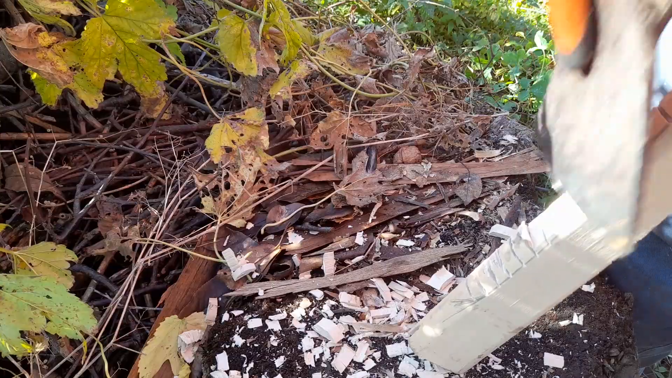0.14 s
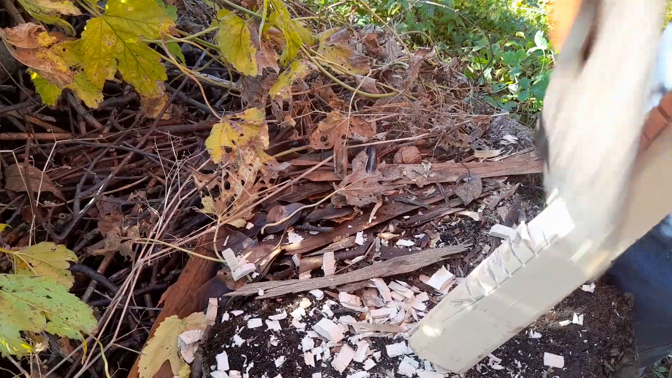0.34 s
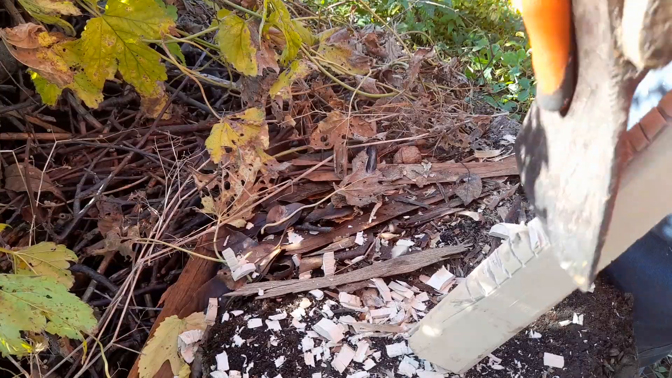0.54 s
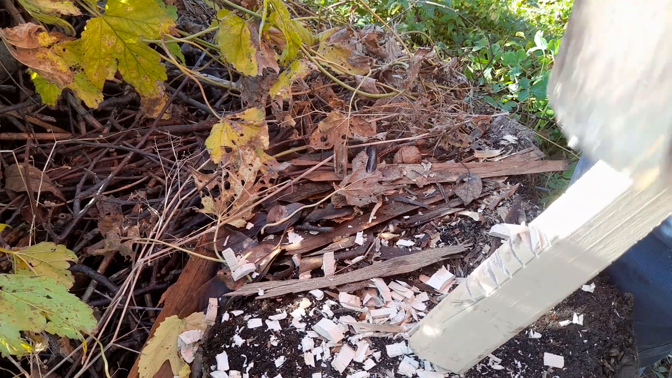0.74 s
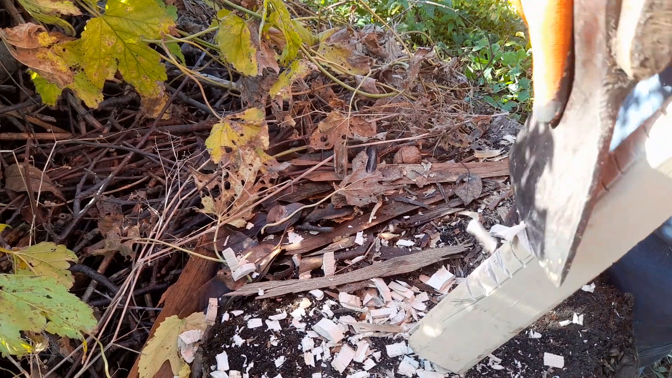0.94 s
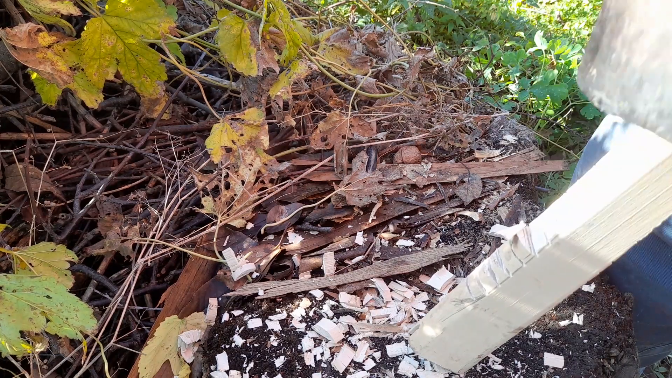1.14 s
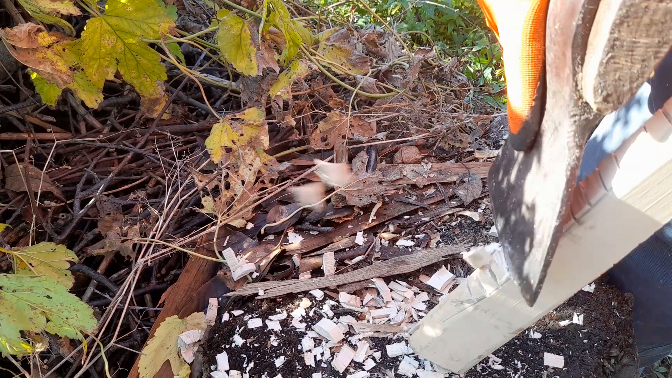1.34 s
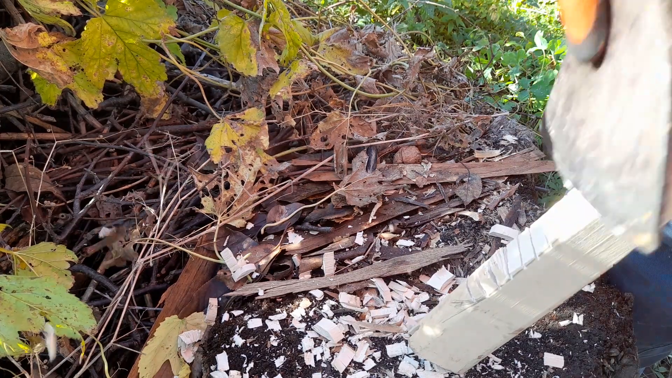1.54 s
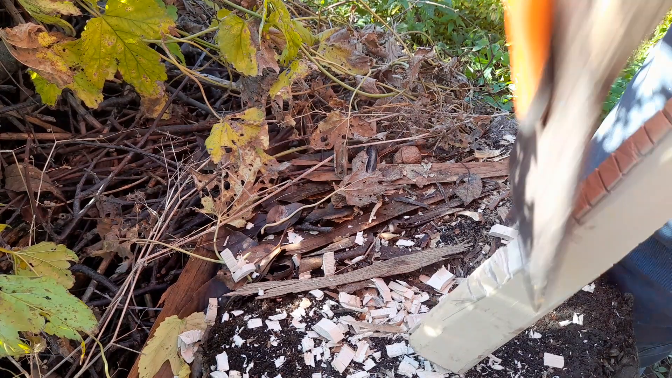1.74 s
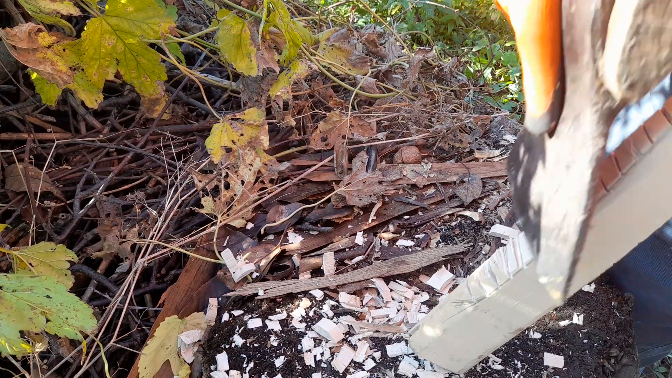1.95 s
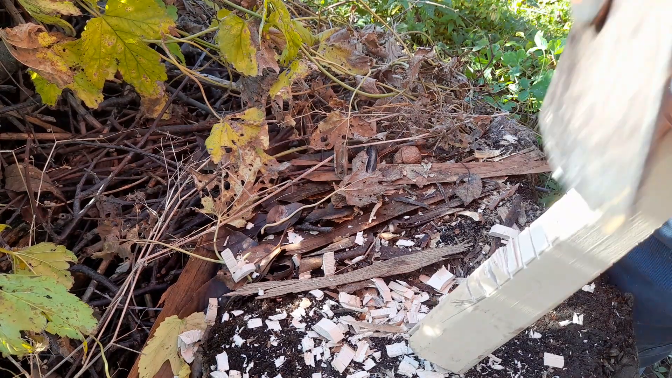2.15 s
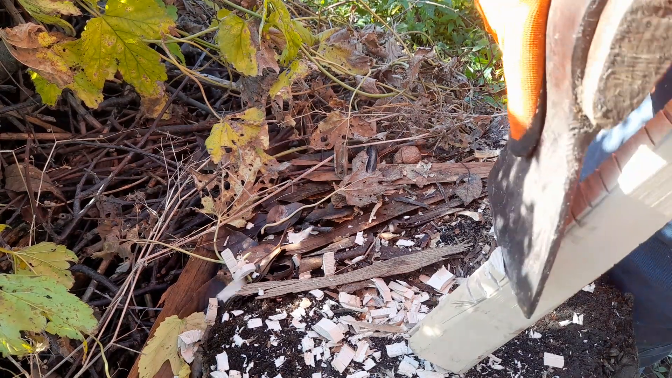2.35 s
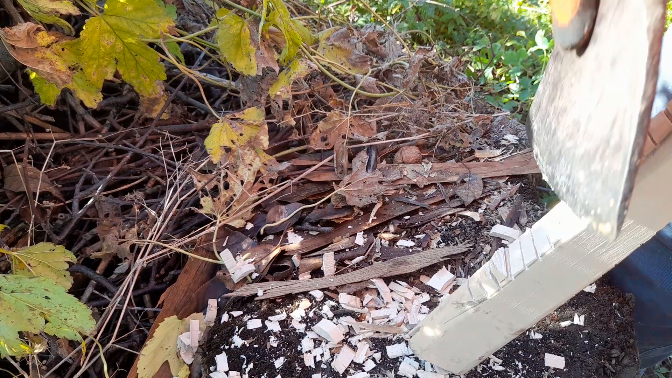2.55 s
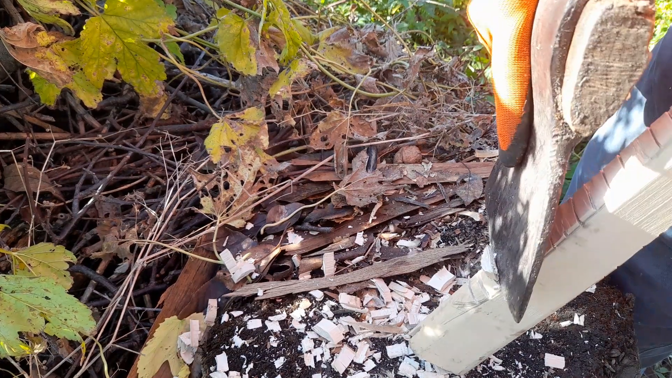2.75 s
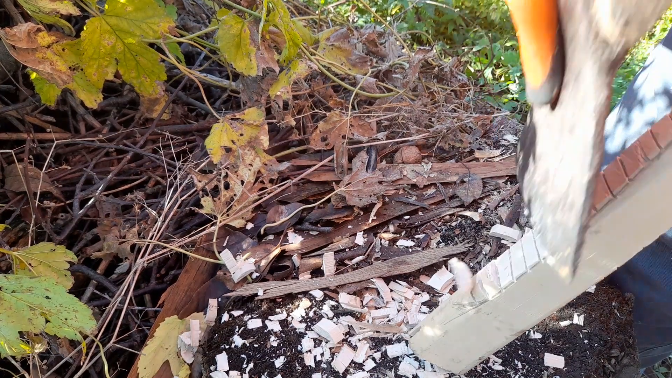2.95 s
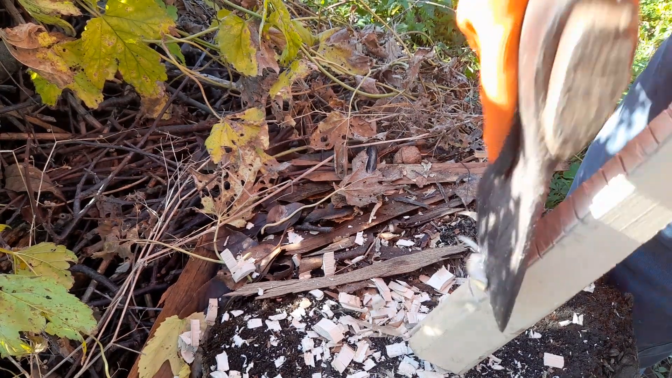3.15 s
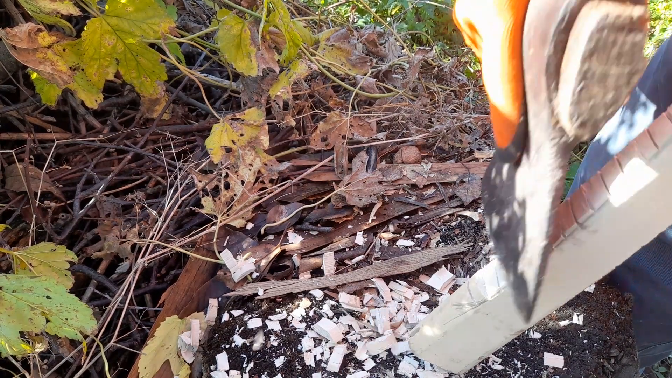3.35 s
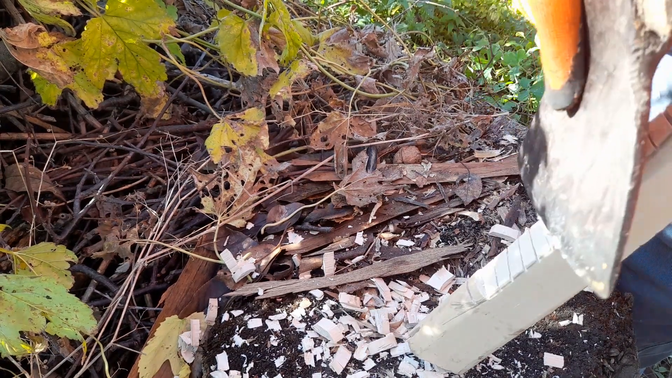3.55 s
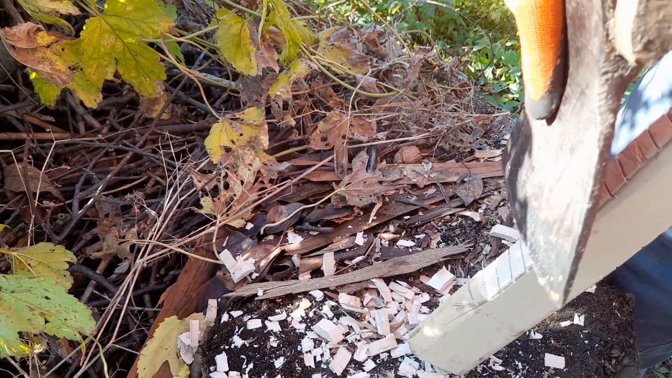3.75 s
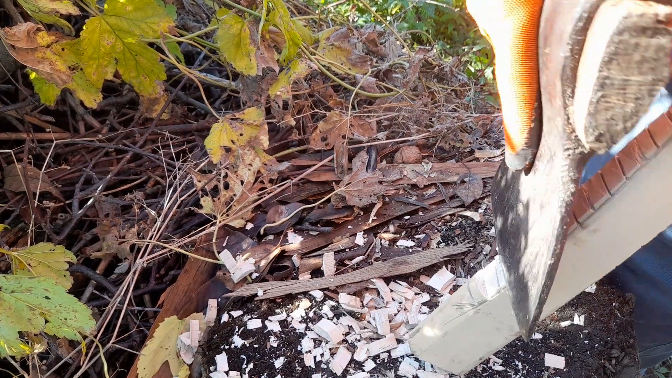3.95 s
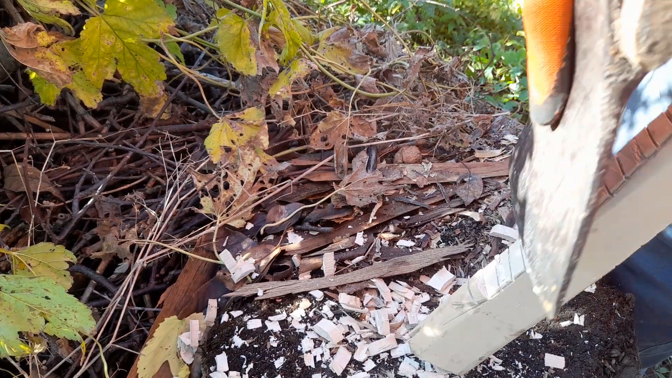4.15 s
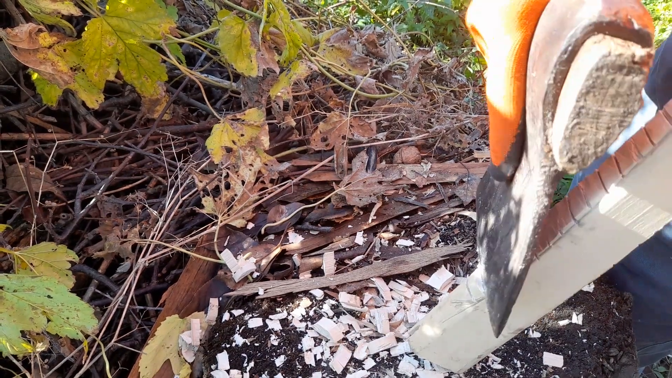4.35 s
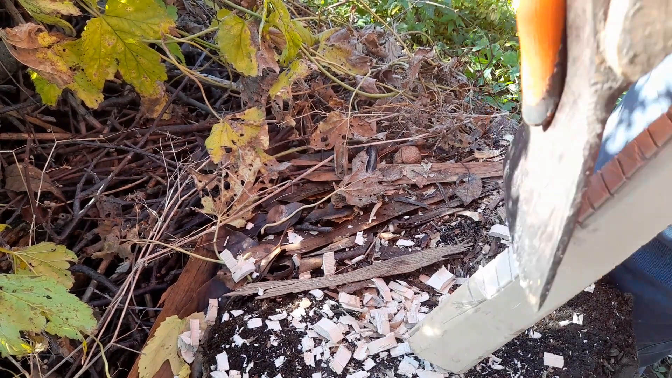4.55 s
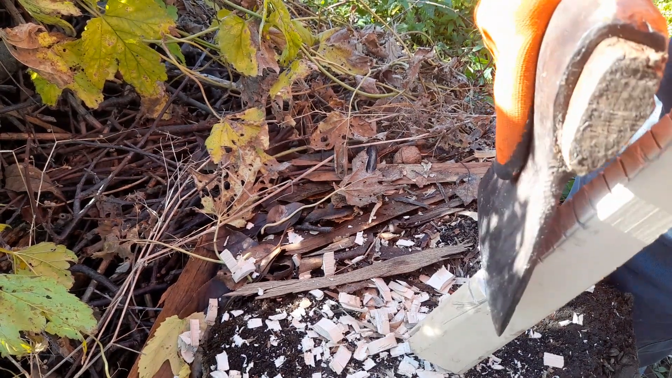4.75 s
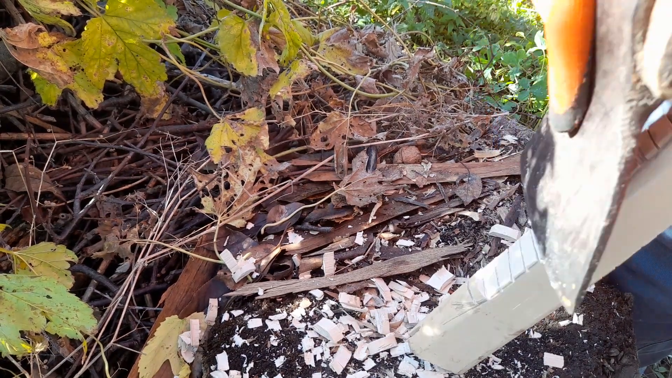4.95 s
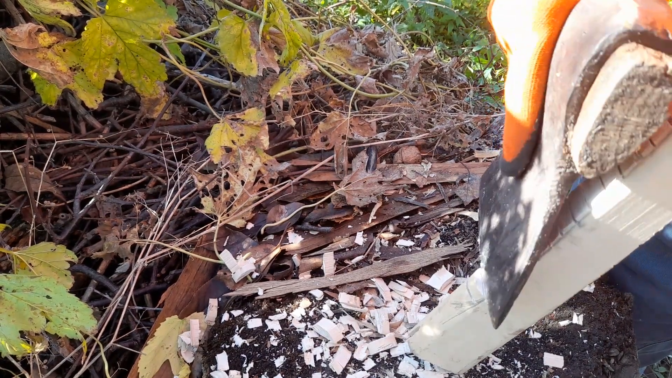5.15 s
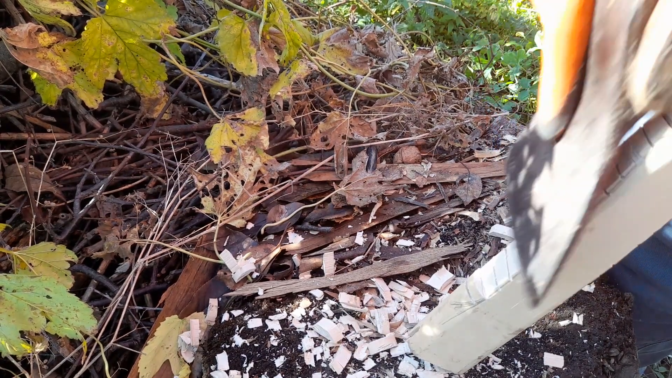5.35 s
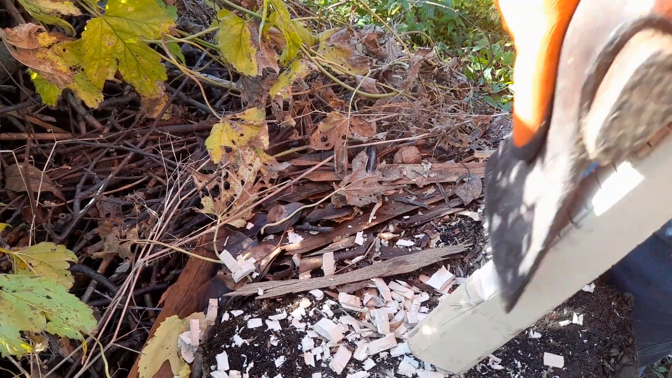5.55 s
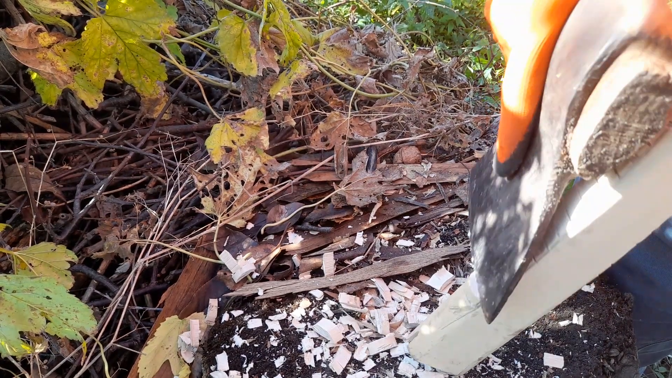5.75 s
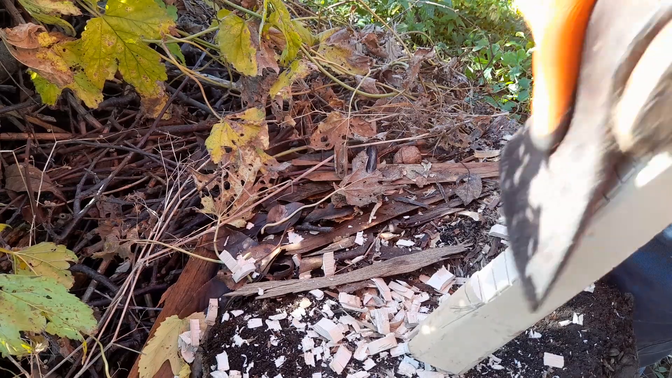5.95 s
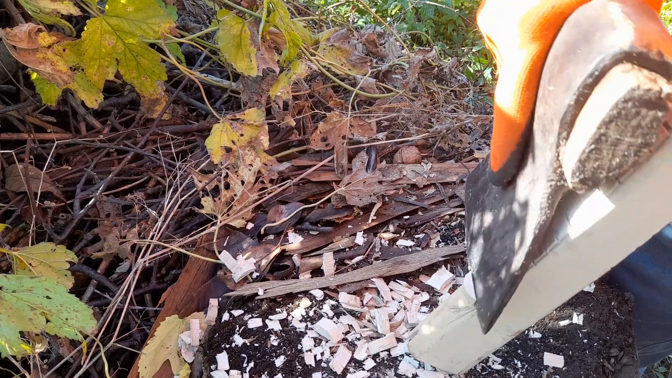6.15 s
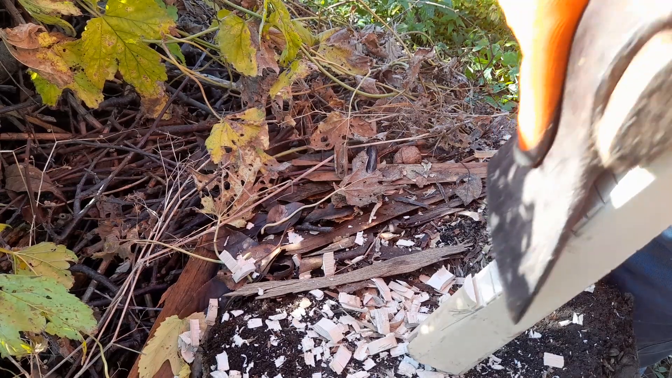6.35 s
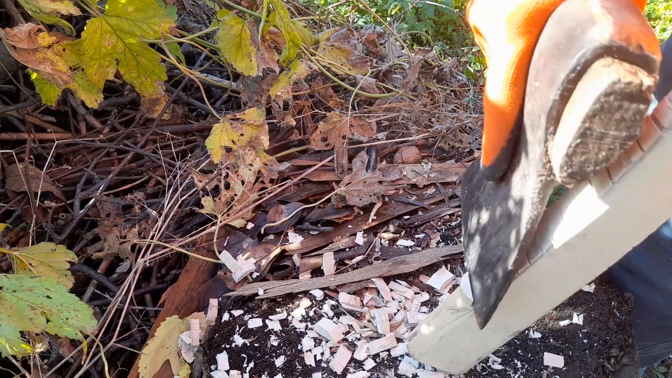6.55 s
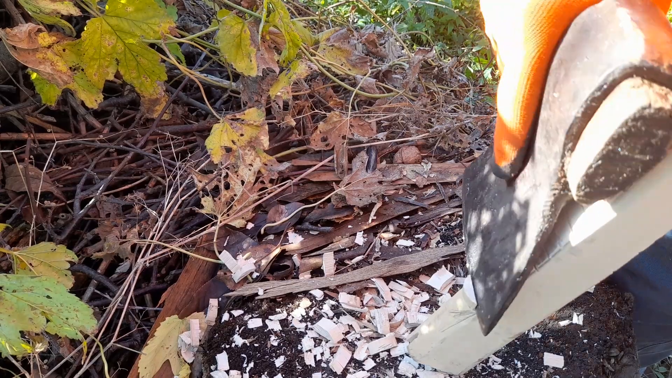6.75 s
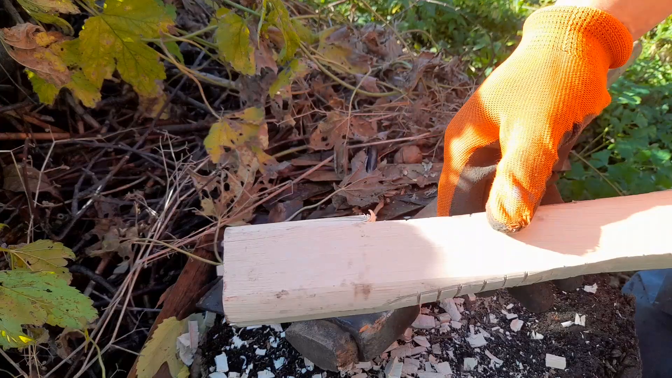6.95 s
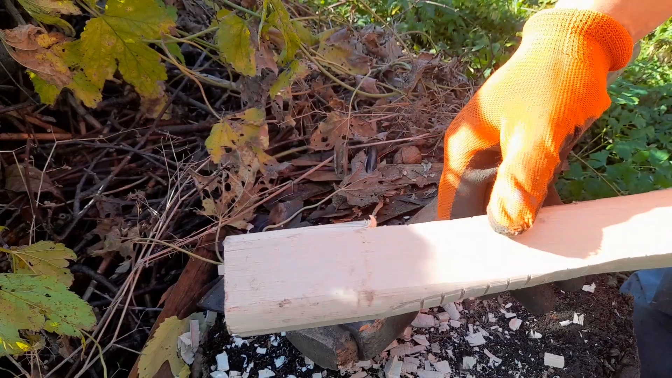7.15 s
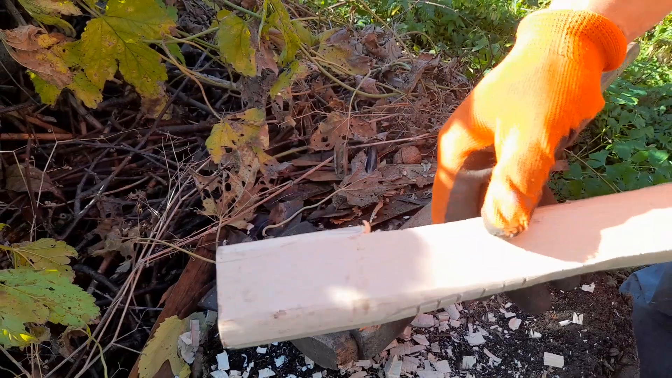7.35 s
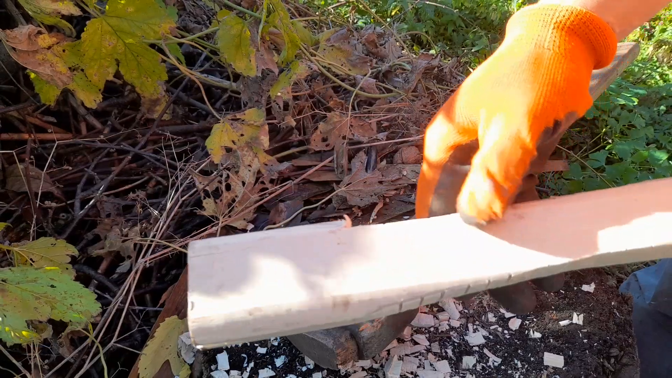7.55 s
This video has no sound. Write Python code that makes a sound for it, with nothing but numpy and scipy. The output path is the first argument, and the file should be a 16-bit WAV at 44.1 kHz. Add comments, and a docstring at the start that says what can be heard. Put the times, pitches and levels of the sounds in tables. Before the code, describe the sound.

A hand axe hews a wooden bar in quick, regular strokes, each a woody knock with a sharp fibre crack, chips ticking into leaves.

```python
"""A hand axe hews chips off a wooden bar in a garden, close to a pair of microphones.
Each stroke is a cluster of knocks, which ring the modes of the bar, and cracks of tearing fibre, bursts of noise.
The steel head rings faintly; between strokes the blade rubs the wood (clumped grains) and taps it.
Chips land in dry leaves as short noise bursts; a far rumble and wind, both coloured noise, lie below."""
import sys
import numpy as np
from scipy import signal
from scipy.fft import rfft, irfft
from scipy.io import wavfile
from scipy.ndimage import uniform_filter1d

SR = 44100
rng = np.random.default_rng(int(sys.argv[2]) if len(sys.argv) > 2 else 0)


def volts(x):
    """Linear amplitude factor 10**(x/20) for a level x in dB, scalar or array-like."""
    e = np.asarray(x, float) / 20
    return 10 ** e


def bounce(signal):
    """Save signal as a 16-bit WAV file at the path given by the first command-line argument."""
    frames = np.transpose(np.atleast_2d(signal))
    limited = np.clip(frames, -1, 1)
    pcm = np.round(limited * 32767).astype(np.int16)
    wavfile.write(sys.argv[1], SR, pcm)


N = 335160     # length in samples


def rms_one(x):
    """Scale to unit power."""
    return x / np.sqrt(np.mean(x ** 2) + 1e-20)


def band(x, low_hz, high_hz, order=2):
    """Butterworth band-pass."""
    edges = [low_hz, min(high_hz, .45 * SR)]
    return signal.sosfilt(signal.butter(order, edges, "band", fs=SR, output="sos"), x)


def drift(rate):
    """Slow random curve: normal draws, rate per second, joined by straight lines."""
    steps = int(N / SR * rate) + 3
    return np.interp(np.arange(N) * rate / SR, np.arange(steps), rng.standard_normal(999)[:steps])


def ring(force, hz, t60):
    """A damped resonator: a unit click sets a sine of height 1 ringing, 60 dB down after t60 seconds."""
    r, w = volts(-60 / (t60 * SR)), 2 * np.pi * hz / SR
    return signal.lfilter([0, np.sin(w)], [1, -2 * r * np.cos(w), r * r], force + 1e-18)


def grains(per_s, spread_db):
    """Random clicks of uneven size, unit power."""
    sizes = volts(spread_db * np.minimum(rng.exponential(1, N), 4)) * rng.choice([-1, 1], N)
    return rms_one(sizes * (rng.random(N) < per_s / SR))


def coloured(spectrum, alike_hz, patchy_db):
    """Stereo noise in half-octave bands that flicker; the channels agree more the further below alike_hz."""
    hz, db = np.transpose(spectrum)
    edges = hz[0] * 2 ** np.arange(0, np.log2(hz[-1] / hz[0]) + .3, .5)
    out = 0
    white = rng.standard_normal((2, 2, N))     # neighbouring bands take turns
    for k, (low, high) in enumerate(zip(edges, edges[1:])):
        centre = np.sqrt(low * high)
        mid, side = band(white[k % 2], low, high)
        alike = 1 / (1 + (centre / alike_hz) ** 2)
        gain = volts(np.interp(np.log(centre), np.log(hz), db) + patchy_db * drift(24))
        out = out + gain * (np.sqrt(1 + alike) * mid + np.sqrt(1 - alike) * side * [[1], [-1]])
    return rms_one(out)


# Spectrum of the far rumble. Each row: frequency in Hz, relative level in dB per Hz.
RUMBLE_SPECTRUM = [(18, -50.5), (30, -23.5), (47, -3), (122, -9.5), (219, -33.5), (274, -25), (500, -43),
                   (650, -62), (1100, -120)]
# Wavering tones in the rumble. Each row: frequency in Hz, width in Hz, relative level in dB.
HUM_TONES = [(95.65, 17, -2.5), (118.65, 11, -6)]


def rumble():
    """Broad low noise with two narrow wavering tones, each a thin band of noise."""
    out = volts(-2) * coloured(RUMBLE_SPECTRUM, 360, patchy_db=6.0)
    for hz, width, db in HUM_TONES:
        tone = rms_one(band(rng.standard_normal(N), hz - width / 2, hz + width / 2))
        out = out + volts(db + 2.5 * drift(3.7)) * tone
    return out


# Spectrum of moving air. Each row: frequency in Hz, relative level in dB per Hz.
AIR_SPECTRUM = [(120, -31.5), (200, -5.5), (219, 1.5), (293, -5.5), (653, -16.5), (904, -11), (3200, -29),
                (4160, -68.5), (7040, -120)]
# Spectrum of stirring leaves. Each row: frequency in Hz, relative level in dB per Hz.
LEAF_SPECTRUM = [(1760, -39), (3000, -15), (3510, 1.5), (8260, -8.5), (12900, 2), (15500, -4),
                 (16500, -11.5)]


def breeze():
    """Low noise of moving air with a patchier bright noise of leaves 4 dB under it."""
    return coloured(AIR_SPECTRUM, 260, patchy_db=1.5) + volts(-4) * coloured(LEAF_SPECTRUM, 370, patchy_db=5.5)


# Levels of the background; the rumble drops away near the end.
# Each row: time in seconds, rumble level in dB, breeze level in dB.
BACKGROUND_LEVELS = [(0, -43.5, -71), (.9, -48.5, -67.5), (1.5, -46.5, -68.5), (2.3, -59.5, -75.5),
                     (3, -57.5, -74), (3.55, -62, -77.5), (4, -52, -73.5), (5, -55, -76.5),
                     (5.5, -58.5, -69.5), (6, -54.5, -69.5), (6.5, -62, -72), (6.86, -56.5, -74),
                     (6.88, -69, -72), (7.6, -80, -73)]


def outdoors():
    """Rumble and breeze, each riding its own level curve."""
    s, *levels_db = np.transpose(BACKGROUND_LEVELS)
    rumble_db, breeze_db = [np.interp(np.arange(N) / SR, s, db) for db in levels_db]
    return volts(rumble_db) * rumble() + volts(breeze_db) * breeze()


# Wind on the right port. Each row: start in seconds, relative level in dB, frequency in Hz.
WIND_PUFFS = [(6.919, -46, 69.7), (6.993, -29.5, 75), (7.068, -36, 60), (7.117, -21, 59.4),
              (7.21, -44, 69.8)]


def gusts():
    """Each puff pushes the right membrane into a short low wobble."""
    out = np.zeros(N)
    for s, db, hz in WIND_PUFFS:
        puff = np.zeros(N)
        puff[int(s * SR)] = volts(db + 3.5)
        out += ring(puff, hz, 0.077)
    return band(out, 33, 237)


def bursts(events, fade_db, below, above):
    """Dense snaps that die away in a wide band; the two ports hear nearly independent noise."""
    size = 8000
    sound = np.zeros((2, N + size))
    t = np.arange(size) / SR
    fade = sum(volts(start_db - 60 * t / t60) for start_db, t60 in fade_db)
    onset = 1 - np.exp(-t / 0.00084)
    for s, db, hz in events:
        snaps = rng.standard_normal((2, size)) * volts(0.28 * rng.standard_normal(size))
        pair = snaps[0] + 0.95 * snaps[1] * [[1], [-1]]
        i = int(s * SR)
        sound[:, i:i + size] += volts(db) * fade * onset * rms_one(band(pair, hz / below, hz * above, order=1))
    sound = sound[:, :N]
    return sound + volts(3) * band(sound, 11500, 19000)     # extra sheen on top


# Chips land in dry leaves.
# Each row: start in seconds, relative level in dB, colour in Hz that scales the edges of the band.
CHIP_LANDINGS = [(0.728, -50, 4980), (1.1336, -39.5, 7370), (1.218, -61.5, 9900), (1.581, -53, 9250),
                 (1.6503, -34.5, 7500), (1.6534, -40.5, 11370), (1.68, -53.5, 11160), (1.775, -56, 4500),
                 (1.803, -56, 4500), (2.497, -43.5, 6150), (2.5075, -46.5, 5500), (2.5236, -48.5, 7820),
                 (2.5469, -54.5, 6910), (2.565, -48.5, 4520), (2.988, -60, 11500), (3.06, -64, 7700),
                 (3.116, -56, 7870), (3.14, -47, 3000), (3.1854, -43, 8700), (3.4107, -35, 8250),
                 (3.475, -49, 5010), (3.9493, -43, 9470), (4.0247, -49, 13200), (6.4013, -47.5, 7140),
                 (6.8792, -43, 11300)]


def chips():
    """A chip hits dry leaves: a tick of noise, 60 dB down within 9 ms."""
    return bursts(CHIP_LANDINGS, [(0.0086, .009)], below=5.1, above=2.4)


# The blade shaves down the bar into a blow. Each row: start in seconds, end in seconds, relative wood level in dB.
SHAVING_SPELLS = [(5.068, 5.145, -41.5), (5.426, 5.494, -42), (5.78, 5.854, -37.5), (6.156, 6.221, -33.5),
                  (6.521, 6.585, -46.5)]
# The blade drags free on the way up.
# Each row: start in seconds, end in seconds, relative wood level in dB, relative steel level in dB.
LIFTING_SPELLS = [(1.041, 1.15, -60.5, -84), (1.479, 1.56, -63, -77), (4.081, 4.157, -68, -72.5),
                  (4.926, 5.011, -66.5, -76), (5.3, 5.397, -57, -69), (5.624, 5.649, -72, -67),
                  (5.648, 5.733, -49.5, -62), (5.993, 6.023, -54, -77), (6.018, 6.113, -48.5, -57.5),
                  (6.39, 6.495, -55, -72.5)]
# Dust and splinters trickle into the leaves. Each row: start in seconds, end in seconds, relative hiss level in dB.
TRICKLES = [(1.584, 1.643, -54), (1.64, 1.703, -68), (3.385, 3.53, -72)]


def spells():
    """Gains of wood, hiss and steel: each spell sets in quickly, swells or fades, and dies away."""
    rise_s, fade_s = .013, .012
    shave_swell_db, lift_swell_db, trickle_swell_db = 10.5, -2.5, -10     # change from start to end
    shave_hiss_db, shave_steel_db, trickle_wood_db = -23.5, -19.5, -7     # re wood, wood, hiss
    rows = [(start, end, shave_swell_db, db, db + shave_hiss_db, db + shave_steel_db)
            for start, end, db in SHAVING_SPELLS]
    rows += [(start, end, lift_swell_db, db, -np.inf, steel_db) for start, end, db, steel_db in LIFTING_SPELLS]
    rows += [(start, end, trickle_swell_db, db + trickle_wood_db, db, -np.inf) for start, end, db in TRICKLES]
    out = np.zeros((3, N))
    for start, end, swell_db, *db in rows:
        t = np.arange(int(start * SR), int(end * SR))
        shape = volts(swell_db * np.linspace(-.5, .5, len(t))) * signal.windows.tukey(len(t), .2)
        shape *= np.minimum(1, (t - t[0]) / (rise_s * SR))
        out[:, t] += volts(db)[:, None] * shape
    keep = np.exp(-1 / (fade_s * SR))
    return np.maximum(out, signal.lfilter([1 - keep], [1, -keep], out + 1e-18))


def rasp(wood_gain, hiss_gain):
    """Clumped grains: a dull rasp where steel rubs wood, a bright hiss of dust and leaves."""
    pair = grains(5000, 1.8) + 0.29 * grains(3700, 18.0) * [[1], [-1]]
    dull = volts(-9.0) * wood_gain * rms_one(band(pair, 1500, 3300, order=1))
    bright = hiss_gain * rms_one(band(pair, 5200, 23000, order=1))
    return volts(4.5 * drift(110)) * (dull + bright)


# The lifted head sings on its lowest mode until the wood stops it.
# Each row: start in seconds, end in seconds, level in dB.
SINGING_SPELLS = [(1.065, 1.38, -66.5), (1.52, 1.841, -72.5), (3.414, 3.505, -76.5), (3.54, 3.716, -88),
                  (4.164, 4.286, -71.5)]


def singing():
    """A thin wavering tone at 2575 Hz that builds as the blade comes free."""
    gain = np.zeros(N)
    for start, end, db in SINGING_SPELLS:
        t = np.arange(int(start * SR), int(end * SR))
        gain[t] = volts(db) * signal.windows.tukey(len(t), .3)
    tone = np.sqrt(2) * np.sin(2 * np.pi * 2575 * np.arange(N) / SR)
    return gain * volts(1.0 * drift(15)) * tone


# One mode of the head rings out of some blows.
# Each row: start in seconds, frequency in Hz, level in dB, t60 in seconds.
LONE_RINGS = [(0.02, 4280, -44, 0.18), (0.467, 5084, -31.5, 0.1), (1.857, 3870, -20.5, .05),
              (2.045, 5325, -71, .35), (3.239, 12340, -39.5, 0.17), (5.492, 6430, -45.5, 0.11),
              (5.84, 2730, -35, 0.14)]


def ring_outs():
    """A single steel mode is struck harder than the rest."""
    at = np.arange(N)
    return sum(ring(volts(db) * (at == int(s * SR)), hz, t60) for s, hz, db, t60 in LONE_RINGS)


# Slow modes of bar and head in the tail of a blow.
# Each row: frequency in Hz, relative level in dB, t60 in seconds.
TAIL_MODES = [(925.5, -50.5, 0.26), (1790, -49.5, 0.27), (3000, -55.5, 0.29), (4240, -57.5, 0.14),
              (5450, -59.5, 0.47)]


def after_ring(tearing):
    """Faint, rough, broken lines in the tail of each blow: slow modes driven by the tearing."""
    out = np.zeros(N)
    for hz, db, t60 in TAIL_MODES:
        rough = drift(90) * volts(3 * drift(3.1))
        out += rough * ring(tearing * volts(db), hz, t60)
    return out


# Modes of the axe head. Each row: frequency in Hz, relative level in dB, t60 in seconds when it rings free.
STEEL_MODES = [(2585, -2, .3), (5260, -1, .22), (6320, -10, .12), (6428, -4, .18), (8545, -3, .22),
               (10650, 0, .22), (10875, -9, .1), (12390, -6, .2), (12560, -2, .2), (15300, -14, .08)]


def steel(push, rubbing):
    """The head rings, each mode coming and going; a hard blow buries it in wood and stops the free ring."""
    out, clear = np.zeros(N), np.ones(N)
    for s, db, *_ in BLADE_KNOCKS:
        if db > -26:
            clear[int(s * SR):int((s + .11) * SR)] = 0
    clear = uniform_filter1d(clear, size=200)
    for hz, db, t60 in STEEL_MODES:
        upper_db = 3.5 * np.log2(hz / 6000)     # the buried head rings more on its upper modes
        held = ring(push * volts(4 * drift(4.4) + upper_db - 28.5), hz, 0.11 * t60)
        free = ring(rubbing * volts(2 * drift(12) - 27), hz, t60)
        out += volts(db) * (held + clear * free)
    return out


# Fibres snap.
# Each row: start in seconds, relative level in dB, colour in Hz that scales the edges of the band.
FIBRE_CRACKS = [(0.0137, -17.5, 4600), (0.0172, -16.5, 5540), (0.025, -17.5, 6180), (0.4634, -17.5, 6100),
                (0.47, -22.5, 6320), (0.9032, -26, 6040), (0.907, -16, 8300), (0.911, -16, 6810),
                (1.3593, -11.5, 6090), (1.366, -20, 7430), (1.372, -15, 10000), (1.3862, -15, 11300),
                (1.856, -20, 5140), (2.2985, -29, 7800), (2.309, -13, 9100), (2.3157, -27.5, 8200),
                (2.76, -20, 5180), (2.7691, -17.5, 8500), (3.224, -19.5, 5410), (3.2378, -16, 9950),
                (3.9151, -30.5, 5710), (3.9383, -59, 12000), (4.295, -31, 5500), (4.3034, -25.5, 6660),
                (4.3139, -21, 5790), (4.321, -30, 5360), (4.3262, -35.5, 8000), (4.7352, -17, 5380),
                (4.7554, -15, 7010), (4.7607, -31.5, 5930), (5.1495, -18, 6630), (5.4884, -22, 6520),
                (5.4932, -21, 6640), (5.8392, -20, 5300), (6.2089, -18, 9000), (6.2264, -31.5, 8090),
                (6.556, -37.5, 4950), (6.5803, -22.5, 4530)]


def cracks():
    """A fibre snaps in a short burst of noise and goes on splintering softly."""
    snap, splinter = (0, .024), (-24, .13)     # starting dB, t60 s
    return bursts(FIBRE_CRACKS, [snap, splinter], below=15.0, above=0.6)


# The blade bites or stops in the wood. Each row: start in seconds, relative level in dB,
# centre of the ring in Hz, low thump in dB relative to that level.
BLADE_KNOCKS = [(0.0134, -12.5, 1160, -3), (0.0212, -15.5, 720, -13), (0.0303, -18.5, 630, -2.5),
                (0.4618, -16.5, 550, -0.5), (0.466, -16, 600, -20), (0.4719, -26.5, 510, 1),
                (0.9028, -14, 860, -5.5), (0.9125, -11, 480, -17.5), (1.3579, -15.5, 670, -13.5),
                (1.3735, -15.5, 1110, -2), (1.3851, -23, 660, -8.5), (1.853, -18.5, 780, -2.5),
                (2.3016, -18, 530, -11), (2.314, -23, 950, -0.5), (2.7584, -19.5, 730, -7),
                (2.7667, -18.5, 990, -21), (2.7758, -13.5, 396, 2.5), (3.223, -15, 790, -10),
                (3.2361, -17, 630, -13), (3.2419, -18, 700, -27), (3.2513, -26, 510, 12),
                (3.9167, -20.5, 730, -6.5), (4.2933, -21, 670, -15), (4.3225, -9, 470, -1.5),
                (4.7335, -23.5, 900, -8), (4.7505, -6, 630, -8), (5.147, -6, 490, -6.5),
                (5.4714, -31, 640, -16), (5.4877, -7, 450, -5.5), (5.8312, -26.5, 610, -10),
                (5.8391, -9, 480, -13), (6.184, -28, 710, -27), (6.1982, -27, 660, -36),
                (6.2107, -22, 760, 7), (6.5776, -11, 970, -2.5)]
# The blade touches the bar lightly between strokes. Each row: start in seconds, relative level in dB.
BLADE_TAPS = [(1.084, -58.5), (4.103, -44.5), (4.93, -64), (5.316, -57), (5.0712, -46), (5.129, -35.5),
              (5.3409, -40.5), (5.367, -38.5), (5.4608, -41.5), (5.6863, -41), (5.7213, -40), (5.789, -48),
              (6.0372, -49.5), (6.05, -44.5), (6.0666, -33), (6.0836, -40), (6.1698, -48), (6.285, -53.5),
              (6.4456, -42.5), (6.4563, -45.5), (6.476, -44.5)]
# Modes of the bar. Each row: frequency in Hz, relative level in dB, t60 in seconds.
BAR_MODES = [(227.5, -2, 0.059), (326, 3, 0.025), (478, 1, 0.026), (621, -3.5, 0.023), (791, -4, 0.04),
             (935.5, -5.5, 0.032), (1208, 0.5, 0.011), (1444, -5, .04), (1563, -3, 0.023), (1992, 6, 0.021),
             (2644, -9, 0.05), (2736, -7, 0.029), (3950, -7, 0.14)]
# Low thump of the bar, then of the ground. Each row: frequency in Hz, relative level in dB, t60 in seconds.
THUMP_MODES = [(153.7, -1.5, 0.06), (75, -23, 0.11)]


def knocks(rubbing):
    """Each knock or tap rings the bar modes near its centre most; rubbing drives the same modes with grains."""
    tap_hz, tap_thump_db = 470, -14.5
    touches = BLADE_KNOCKS + [(*tap, tap_hz, tap_thump_db) for tap in BLADE_TAPS]
    s, db, centre_hz, thump_db = np.transpose(touches)
    at, out = (s * SR).astype(int), np.zeros(N)
    mode_hz, mode_level_db, _ = np.transpose(BAR_MODES)
    luck_db = rng.normal(0, 3.2, (len(s), len(BAR_MODES)))
    octaves = np.log2(mode_hz / centre_hz[:, None])
    soft_db = 6.0 - 0.33 * (db[:, None] + 1.5)     # light touches are softer and ring fewer modes
    soft_db[len(BLADE_KNOCKS):] += 13     # taps ring a narrower set still
    away_db = soft_db * octaves ** 2 / (1 + 0.88 * abs(octaves))
    share = volts(mode_level_db + luck_db - away_db)
    share /= np.sqrt((share ** 2).sum(axis=1, keepdims=True))
    for k, (hz, mode_db, t60) in enumerate(BAR_MODES):
        force = rubbing * volts(mode_db - 8.1 * np.log2(hz / 450) ** 2 - 28)     # rubbing favours modes near 450 Hz
        force[at] += (-1) ** k * share[:, k] * volts(db + 6.5)     # neighbouring modes start opposed
        out += ring(force, hz, t60)
    push = np.zeros((2, N))     # bar and ground give way a little later
    push[:, at + int(.0015 * SR)] = volts([db + thump_db, db])
    for force, (hz, mode_db, t60) in zip(push, THUMP_MODES):
        out += volts(mode_db) * ring(force, hz, t60)
    return out


# Echo of the garden. Each row: frequency in Hz that scales the band, t60 in seconds, relative level in dB.
GARDEN_ECHO = [(200, 0.57, -30), (494.3, 0.37, -36), (1160, 0.12, -23), (3000, .22, -30),
               (6500, 0.059, -25.5), (13200, 0.083, -18.5)]


def echo(x):
    """Ground and shrubs scatter the sound: per band, fresh noise fed by its power and dying away."""
    out = 0
    for hz, t60, db in GARDEN_ECHO:
        keep = volts(-120 / (t60 * SR))     # power, so twice the dB
        power = signal.lfilter([volts(2 * db) * 200 / SR], [1, -keep], band(x, hz / 1.026, hz * 1.527) ** 2)
        noise = rms_one(band(rng.standard_normal((2, N)), hz / 3.8, hz * 1.8))
        out = out + noise * np.sqrt(np.roll(power, int(0.0021 * SR)))     # the way round is longer
    return out


# The two ports compared. Each row: frequency in Hz, left minus right in dB, lag of the left in radians.
PORT_DIFFERENCE = [(250, -1, .2), (780, .5, .7), (1400, -2.5, 1.8), (2500, -2.4, 1.7), (4400, 0, 4.6),
                   (9000, 5, 7.8), (16000, 4.5, 14)]


def ports(pair):
    """The left port hears the axe later and in another colour."""
    hz = np.fft.rfftfreq(N, 1 / SR)
    at_hz, db, lag = np.transpose(PORT_DIFFERENCE)
    tilt = volts(np.interp(np.log(hz + 1), np.log(at_hz), db) / 2)
    delay = np.exp(-1j * np.interp(hz, [0, *at_hz], [0, *lag]))
    return irfft(rfft(pair) * [tilt * delay, 1 / tilt], N)


def scene():
    """Wood, fibres and steel reach the ports directly and by way of the garden, over rumble, air and wind."""
    wood_gain, hiss_gain, steel_gain = spells()
    tearing = cracks()
    axe = tearing + knocks(wood_gain * grains(680, 4.8))
    axe += steel(tearing[0], steel_gain * grains(2200, 3.0))
    axe += after_ring(tearing[0]) + ring_outs() + singing()
    axe += rasp(wood_gain, hiss_gain) + chips()
    out = ports(axe) + echo(axe[0]) + outdoors()
    out[1] += gusts()
    return out


def roll_off(x):
    """The treble ends steeply here."""
    return signal.sosfilt(signal.butter(12, 17140, fs=SR, output="sos"), x)


def record(dry):
    """Cuts the lows under 60 Hz and the top near 17 kHz."""
    mix = signal.sosfilt(signal.butter(2, 60, "high", fs=SR, output="sos"), dry)
    mix = signal.sosfilt(signal.cheby2(14, 60, 17100, fs=SR, output="sos"), mix)
    return roll_off(mix)


dry = scene()
out = record(dry)
bounce(out)
```